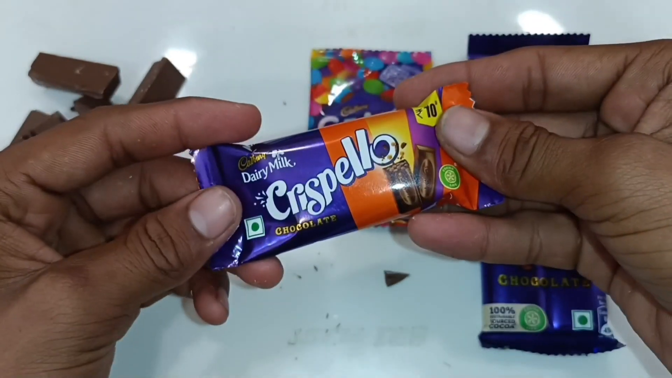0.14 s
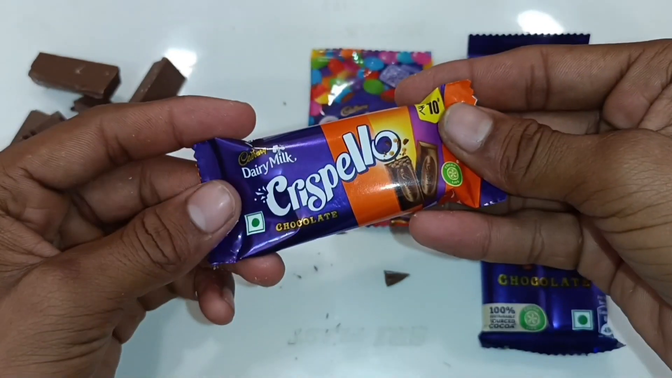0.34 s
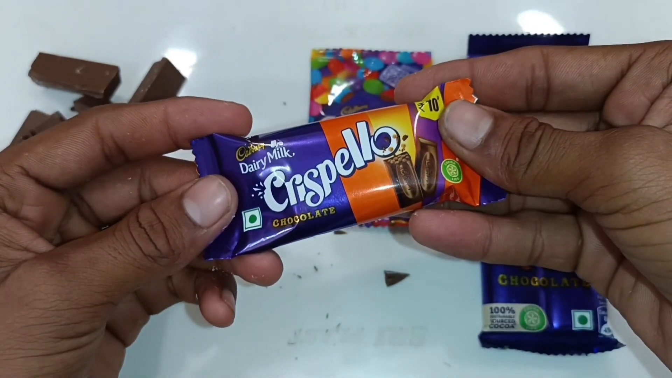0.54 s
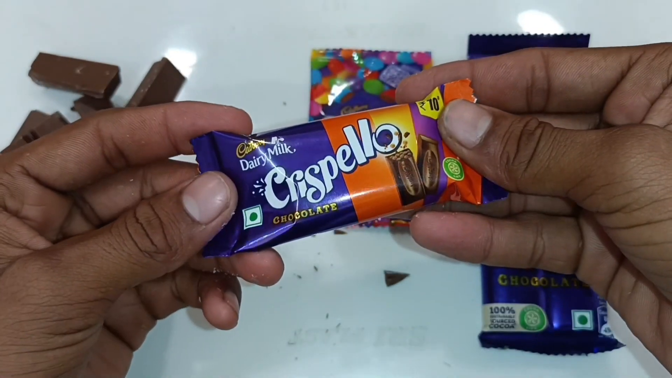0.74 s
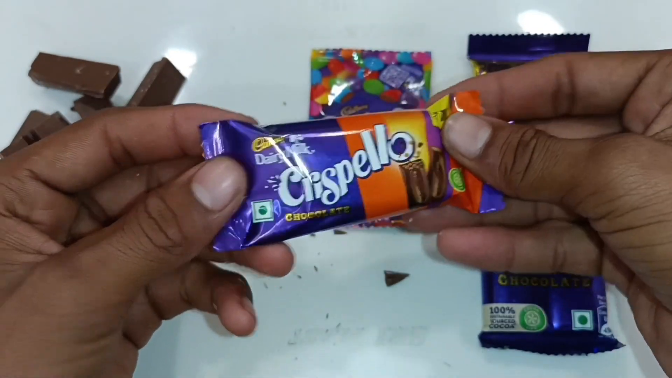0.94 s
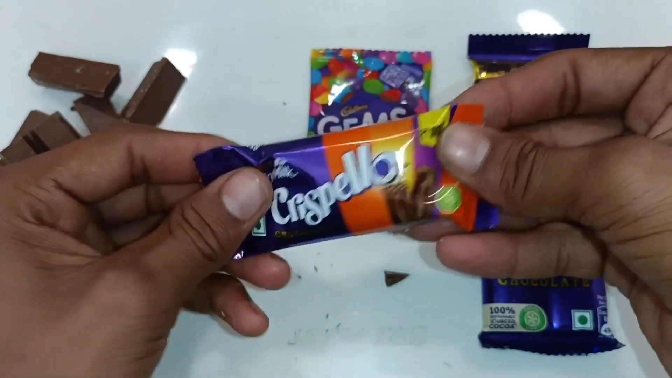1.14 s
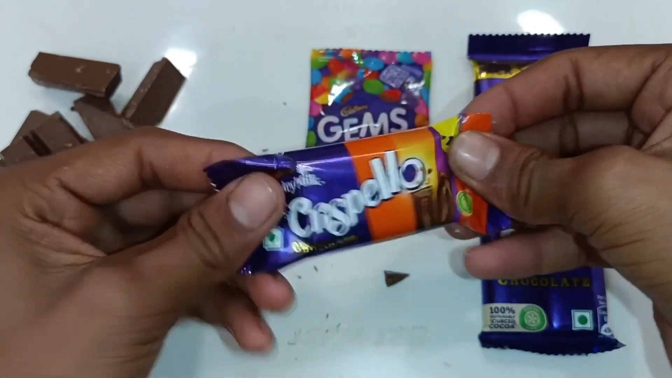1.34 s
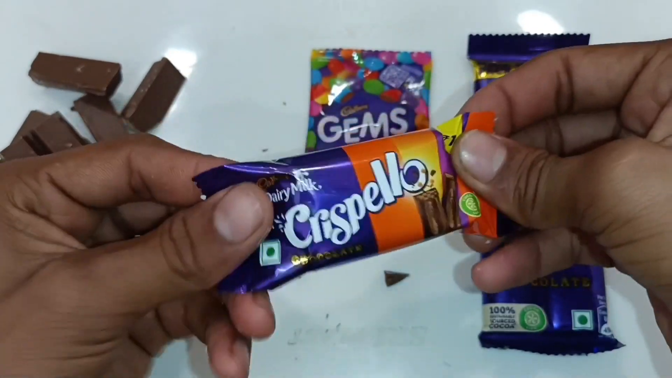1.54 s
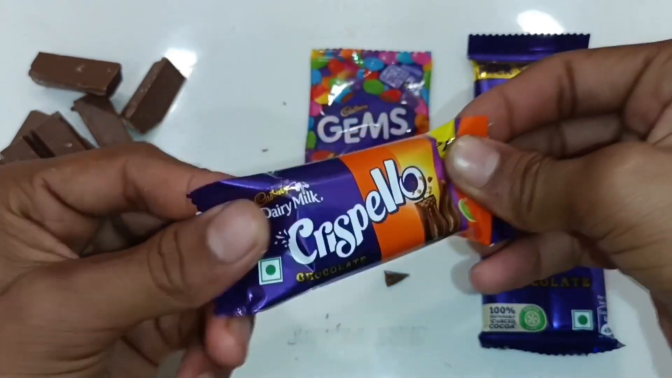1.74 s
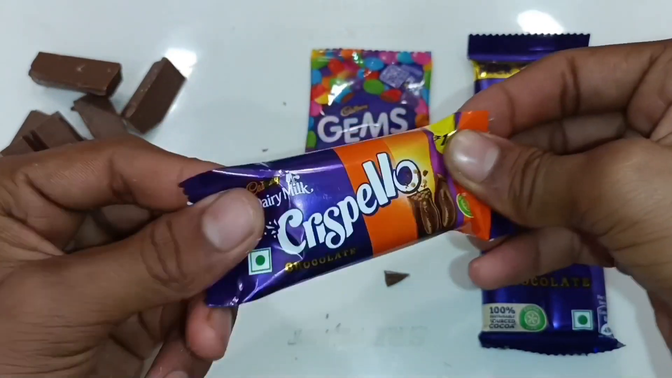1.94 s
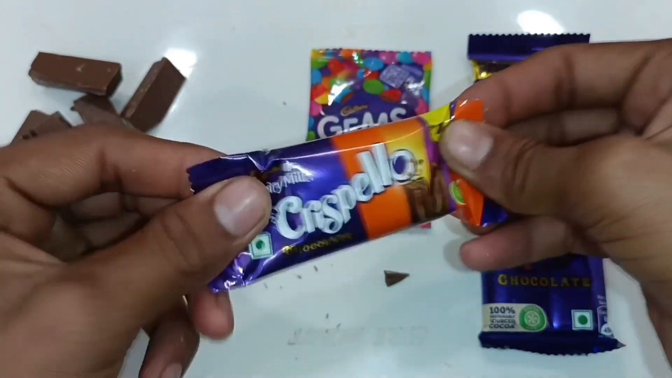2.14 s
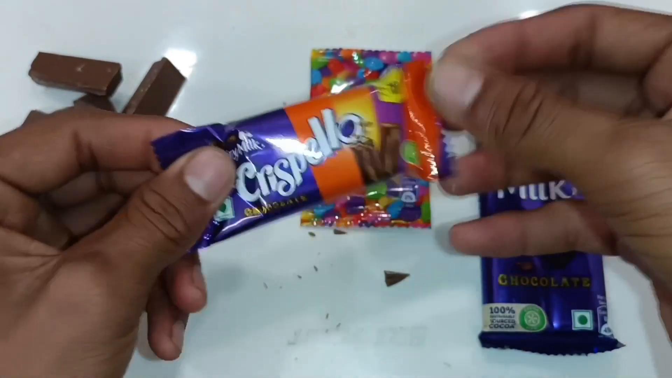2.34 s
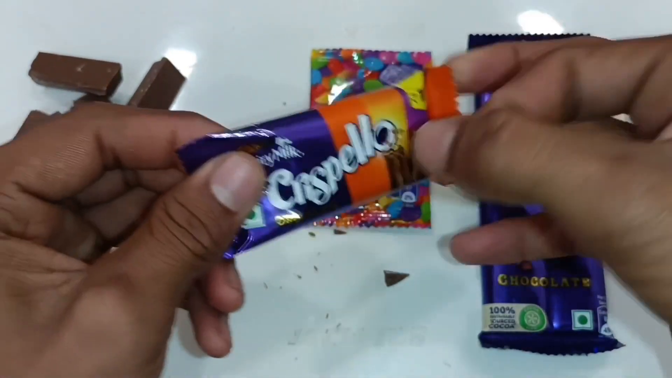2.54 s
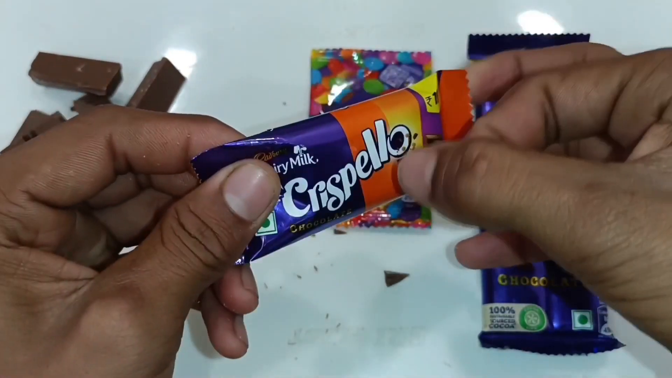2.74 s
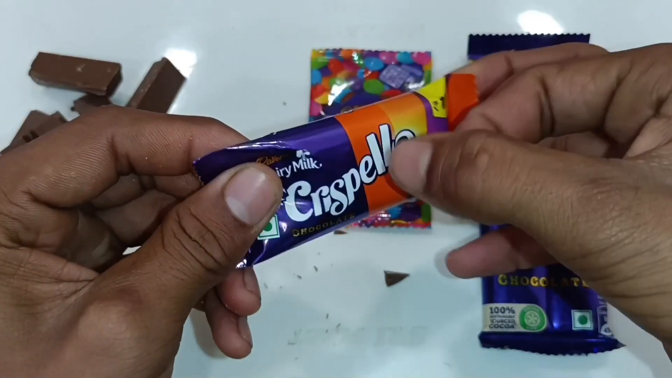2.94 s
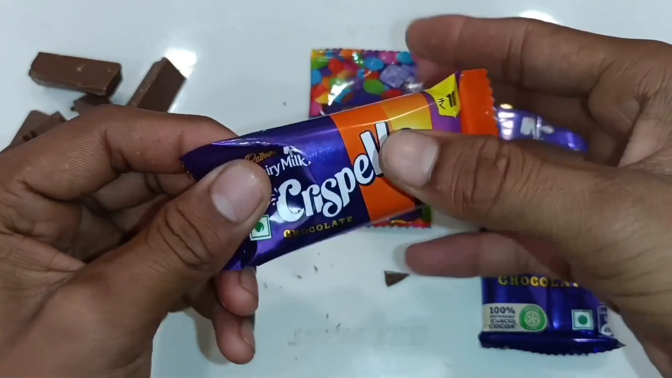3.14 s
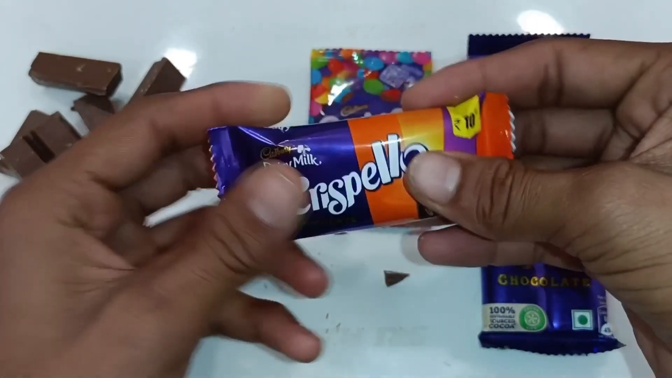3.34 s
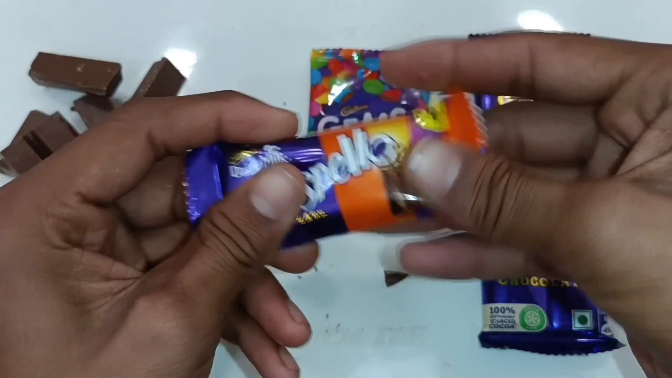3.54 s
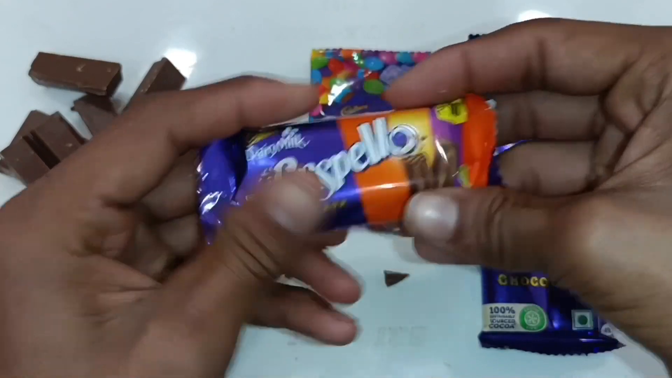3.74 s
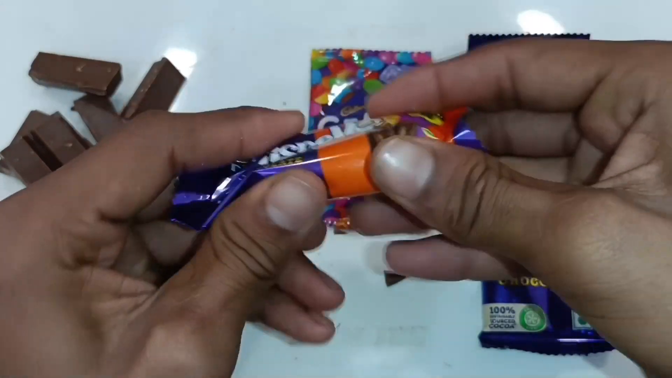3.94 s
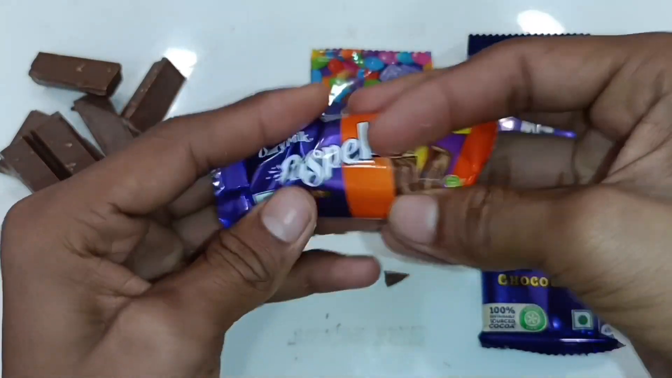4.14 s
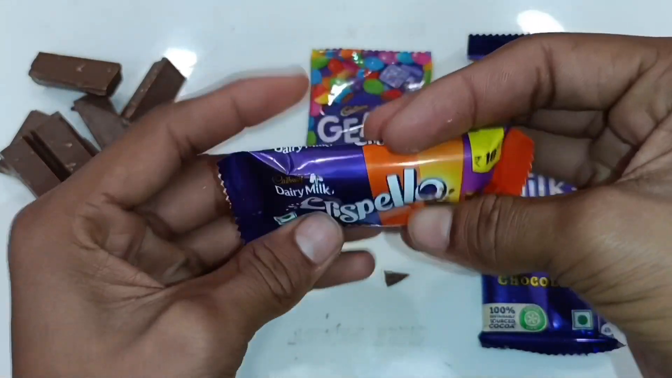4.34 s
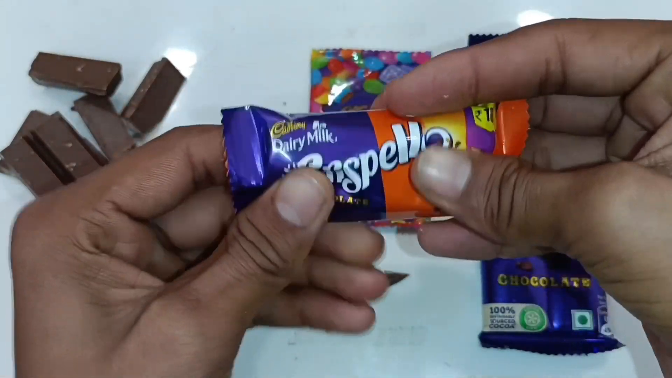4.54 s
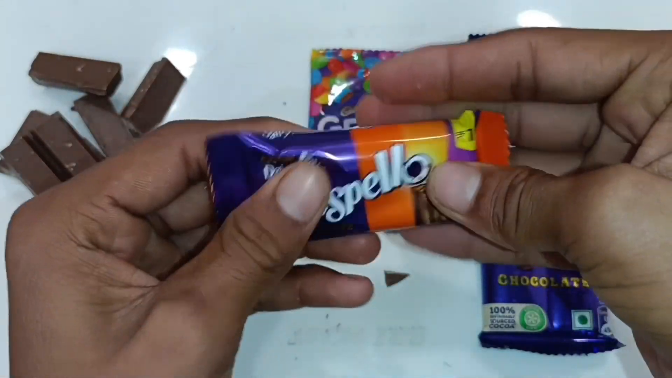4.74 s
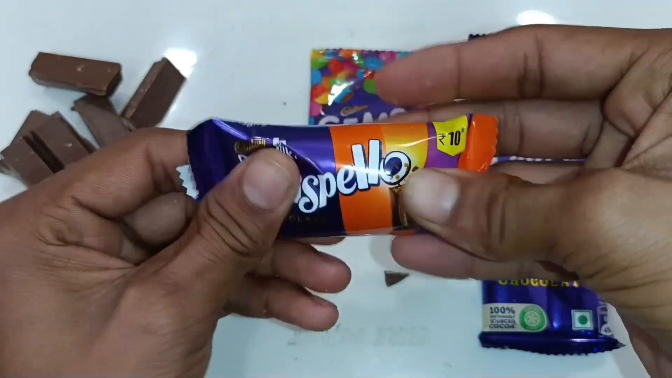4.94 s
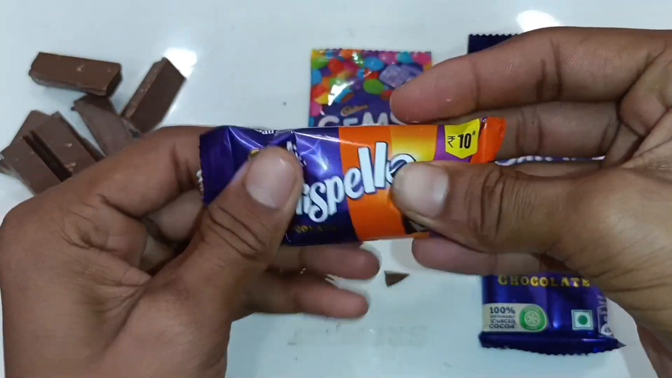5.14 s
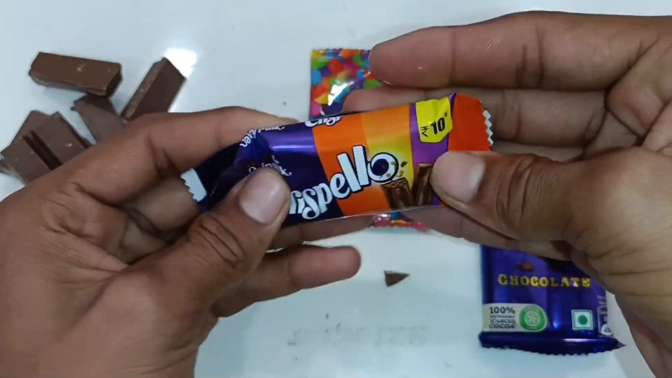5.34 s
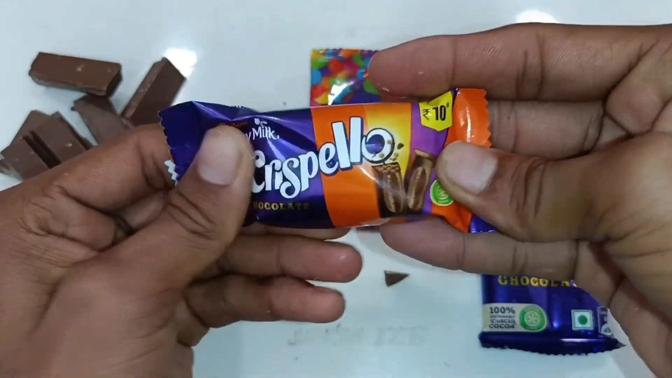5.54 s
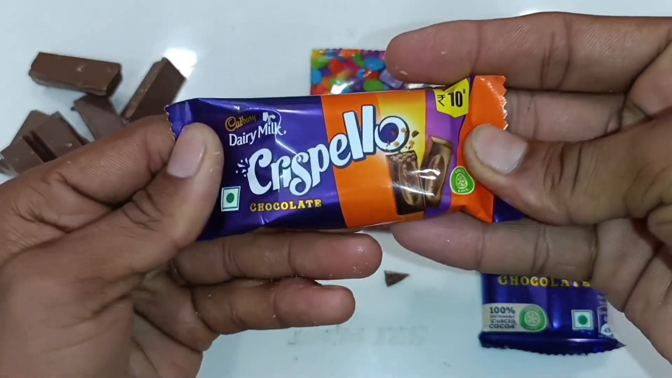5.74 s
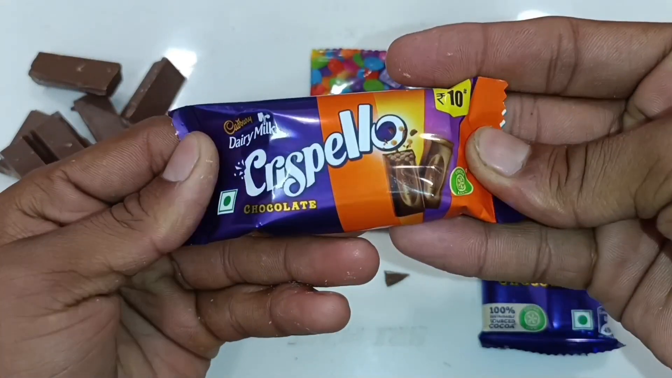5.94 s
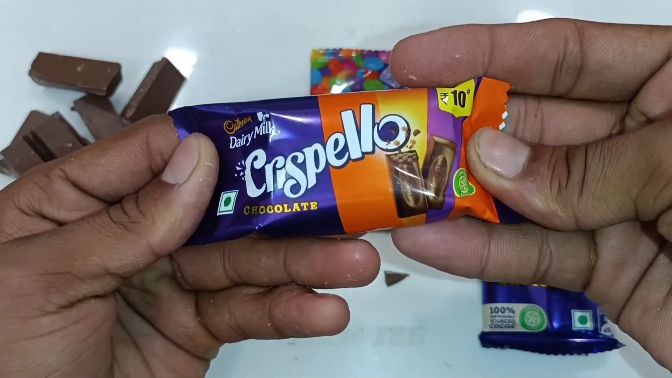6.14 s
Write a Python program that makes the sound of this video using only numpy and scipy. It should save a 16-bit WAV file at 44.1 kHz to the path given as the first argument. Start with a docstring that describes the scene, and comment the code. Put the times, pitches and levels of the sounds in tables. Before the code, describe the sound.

A small plastic bar wrapper is crumpled by two hands right under a phone microphone in a quiet room. One small snap, near silence, then dense bright cracks and fine crackle, easing briefly midway before returning stronger. The loudest snaps distort, some with a dull low thump. Short reflections follow from the walls, and the crinkling thins into faint ticks and hush.

```python
"""Sharp snaps of a thin plastic bar wrapper, squeezed by two hands just under a phone microphone in a quiet room.
Each snap is a noise crack with a ringing panel; many tiny filtered noise ticks make a fine crackle around them.
The loudest snaps overload the microphone; short low thumps, decaying sines, come with some of them.
The walls answer the wrapper a moment later with fading noise echoes, over a faint room tone."""
import sys
import numpy as np
from scipy import signal
from scipy.fft import rfft, irfft, next_fast_len
from scipy.io import wavfile
from scipy.ndimage import uniform_filter1d

SR = 44100
rng = np.random.default_rng(int(sys.argv[2]) if len(sys.argv) > 2 else 0)


def rack_gain(trim_db):
    """Turn a fader trim in dB into the linear factor to multiply a signal by."""
    fader = np.asarray(trim_db, float)
    return 10 ** (fader / 20)


def bounce(signal):
    """Save signal as a 16-bit WAV file at the path given by the first command-line argument."""
    frames = np.transpose(np.atleast_2d(signal))
    limited = np.clip(frames, -1, 1)
    pcm = np.round(limited * 32767).astype(np.int16)
    wavfile.write(sys.argv[1], SR, pcm)


N = 272979  # length in samples

# The buckling snaps that stand out at the microphone.
# Each row: time in seconds, crack level in dB before the film colours it, panel ring peak in dB, panel pitch in Hz.
SNAP_EVENTS = [(0.0571, -5, -15, 928), (0.1586, -52, -42, 990), (0.1715, -57, -38.5, 960),
               (0.7912, -52.5, -41, 910), (0.804, -52.5, -48, 2810), (0.955, -24.5, -18, 2240),
               (0.9896, -2, -3, 1870), (1.035, 1.5, -12.5, 2950), (1.0761, 9.5, -14.5, 2840),
               (1.094, 7, -8.5, 2200), (1.1156, -15, -4.5, 2190), (1.1326, -10, -1, 2210),
               (1.1412, 6, 2.5, 2890), (1.2354, -17, -14.5, 1830), (1.25, 3, -5.5, 2020),
               (1.2557, 4.5, -27.5, 2710), (1.2812, 5.5, -18, 3180), (1.3412, 2.5, -13.5, 3220),
               (1.3549, -13, -7.5, 1200), (1.374, 8, -5, 2900), (1.3853, -6, -19.5, 1830),
               (1.4017, 3, -15, 3730), (1.4073, -2.5, -10.5, 4180), (1.4681, 7.5, -3, 1910),
               (1.492, -1.5, -17.5, 2920), (1.55, -2.5, -22, 913), (1.5712, 5.5, -6.5, 2870),
               (1.5934, 0.5, -3.5, 2000), (1.6088, 4.5, -7, 3460), (1.619, 8, -7, 3430),
               (1.6788, 6.5, -2, 3950), (1.6966, 3.5, -7.5, 2960), (1.7058, -1, -13, 2880),
               (1.7144, 4.5, -21, 3670), (1.73, 9.5, -0.5, 2970), (1.8101, 9, -1, 1964),
               (1.8266, -8, -4.5, 2890), (1.8361, 8, 0.5, 3650), (1.9104, 12.5, -8.5, 3070),
               (1.9333, 2.5, -11, 3610), (1.9718, 0, -4.5, 3710), (2.0232, -3.5, -2, 2950),
               (2.0326, 8.5, -14, 2090), (2.0436, -0.5, -13, 2970), (2.0559, 6, -18, 2980),
               (2.1161, 7, -8, 3030), (2.1264, 6, -3.5, 3160), (2.1518, 7, -9.5, 1970),
               (2.1613, 9, -6, 3030), (2.199, 2, -14, 2810), (2.2902, 1, -30, 2500),
               (2.3257, -18, -19.5, 730), (2.347, -34, -21, 850), (2.3637, -2.5, -21, 2980),
               (2.3731, -4, -14.5, 1700), (2.3799, -31, -7, 2870), (2.3929, -6, -4, 2710),
               (2.4037, -7.5, -5.5, 2850), (2.4083, 3.5, -5, 2850), (2.4308, -8, -13, 3060),
               (2.5203, -25.5, -26, 2680), (2.6065, -11, -8.5, 2230), (2.8219, 0, -11.5, 2870),
               (2.8316, -17, -9.5, 930), (2.8751, -5.5, -12, 1960), (2.8917, -10, -11.5, 855),
               (2.9072, -12, -11.5, 2810), (2.981, 1, -4.5, 930), (3.031, 10, 6, 2815),
               (3.037, 4.5, 2, 2490), (3.0536, 3, -9.5, 2790), (3.0876, -2, -14, 2940),
               (3.0943, 6.5, -11, 2030), (3.1007, -1.5, -4.5, 900), (3.1268, -1, -12.5, 2830),
               (3.1402, -11, -3.5, 2820), (3.2504, -7, -10, 1920), (3.2736, -22, -12, 1110),
               (3.284, -16, -14, 1480), (3.2998, 7, -15.5, 2790), (3.3282, -10.5, -17.5, 3500),
               (3.3536, -3.5, -16.5, 2790), (3.405, -20.5, -17.5, 2190), (3.4224, 13, 1, 2220),
               (3.4439, 6, -8, 1523), (3.4624, 11.5, 2, 2320), (3.474, -1.5, -5.5, 2770),
               (3.5313, 7.5, 4.5, 4640), (3.544, 4, -21.5, 950), (3.5648, 10, -14, 4390),
               (3.581, 5, -13, 1800), (3.6476, -2, -18, 3960), (3.6686, -2.5, -5, 2680),
               (3.7024, 4.5, -13.5, 2900), (3.7131, 7, -5, 1900), (3.7277, 0.5, 0.5, 1920),
               (3.7417, 11, -7.5, 2520), (3.7515, 10.5, 1.5, 2880), (3.7772, 7, 3, 2750),
               (3.8261, 13.5, -14.5, 2470), (3.8996, -2, -8, 2810), (3.9161, 3.5, -12, 1960),
               (3.9201, -2, -2.5, 2420), (3.9799, -10, 0.5, 2180), (3.996, -8, 3, 2000),
               (4.003, 6, -2.5, 740), (4.0129, 5, -1.5, 930), (4.0377, 3.5, -1.5, 2870),
               (4.0454, 0, -6.5, 2040), (4.0825, -0.5, -2, 2120), (4.0883, 11, 3.5, 2080),
               (4.178, 2, -5.5, 2610), (4.2237, -11, -8.5, 4070), (4.2411, -6, -6.5, 1980),
               (4.277, -3, -6.5, 950), (4.295, 7, -7.5, 2730), (4.3148, 7, -24, 3310),
               (4.344, -3, -14, 2890), (4.3998, -6.5, -2, 2140), (4.4057, 5.5, -17.5, 4130),
               (4.4228, 0, -8.5, 2720), (4.4722, 3.5, -25.5, 2570), (4.485, 11, -19.5, 2040),
               (4.5039, 5.5, -7, 2720), (4.5521, -4.5, -14, 2860), (4.579, 2.5, -8, 3400),
               (4.589, 4.5, -1.5, 3310), (4.6009, 8.5, -4, 1020), (4.6491, 5.5, 0, 3490),
               (4.6526, 6.5, -8.5, 4160), (4.712, 11.5, 2, 2100), (4.7199, 7.5, 0.5, 2210),
               (4.7265, 4.5, -11.5, 2010), (4.7317, 6.5, 2, 2960), (4.76, 7.5, -11.5, 2920),
               (4.7663, 4, -2, 2915), (4.7863, 3, -7.5, 2850), (4.8162, 7, 4.5, 2560),
               (4.8393, 1.5, -9.5, 2050), (4.86, -6.5, -9, 2820), (4.8701, 9, -30, 3120),
               (4.9219, 4, -23.5, 4240), (4.9357, -4.5, -35, 3880), (4.994, -11, -31, 2880),
               (5.0669, -5, -20.5, 2220), (5.0989, -18.5, -13.5, 2200), (5.1257, 8, -1.5, 2980),
               (5.1514, -3, -6, 2860), (5.1646, 5, -3, 4600), (5.1968, 11.5, -1.5, 2250),
               (5.2091, 5.5, -7, 3000), (5.216, 12.5, 1, 2985), (5.2336, 3.5, -19, 2140),
               (5.2628, -11.5, -28, 2120), (5.2704, 6.5, -14.5, 2960), (5.3135, -3.5, -25.5, 2870),
               (5.3284, 9.5, -5, 4130), (5.3434, 3, -19.5, 1980), (5.3747, 12, 2.5, 2224),
               (5.4209, 5, -15.5, 4390), (5.4301, 6.5, 1, 2470), (5.4457, 9.5, -9, 4020),
               (5.4932, -1.5, -17, 2660), (5.5649, -8.5, -3.5, 2890), (5.5704, 11.5, -18, 2270),
               (5.5827, -12.5, -22.5, 962), (5.6164, 3, -18, 2050), (5.6227, 2, -20, 3510),
               (5.6539, 4, -40, 2110), (5.708, 1.5, 2.5, 2300), (5.769, -26, -21.5, 2360),
               (5.8157, -3.5, -25.5, 2240), (5.8321, -19, -20, 3990), (5.9961, -29.5, -49, 3470),
               (6.0222, -36, -53, 3390), (6.0476, -35.5, -57.5, 2370), (6.0766, -36.5, -49, 2370),
               (6.1088, -36, -53.5, 2450), (6.173, -22, -30.5, 3000), (6.1826, -16.5, -58, 2780)]
# Colour of the film as heard through the close microphone. Each row: frequency in Hz, gain in dB.
FILM_COLOUR = [(88, 2), (150, 2.5), (376, -3), (837, 6.5), (1560, -3.5), (2870, 2), (3220, -13),
               (5790, -13.5), (8560, -1), (14800, -20.5), (16000, -27)]
SUPPRESS_DB = 12  # the most by which the phone turns faint sound down


def unit(x):
    """Scaled to rms 1."""
    return x / np.sqrt(np.mean(x ** 2) + 1e-20)


def along(points, hz):
    """(Hz, value) points read on a log frequency axis."""
    f, v = np.transpose(points)
    return np.interp(np.log(hz + 1), np.log(f + 1), v)


def filtered(x, response):
    """x shaped by a response given as a function of frequency in Hz."""
    m = next_fast_len(x.shape[-1] + 8192)  # zeros at the end leave room for ringing
    spectrum = rfft(x, m) * response(np.fft.rfftfreq(m, 1 / SR))
    return irfft(spectrum, m)[..., :x.shape[-1]]


def placed(rows, times):
    """Sum of short sounds, one per row, each starting at its time in seconds."""
    at = np.round(times * SR).astype(int)[:, None] + np.arange(rows.shape[1])
    return np.bincount(at.ravel(), rows.ravel(), N + SR)[:N]


def bursts(count, t60, rise):
    """Rows of noise that jump up and die within milliseconds, each with the energy of its peak-1 envelope."""
    t = np.arange(1024) / SR
    shape = rack_gain(-60 * t / t60) * (1 - np.exp(-t / rise))
    rows = rng.standard_normal((count, len(t))) * shape
    norm = np.linalg.norm(shape, axis=-1, keepdims=True) / shape.max(axis=-1, keepdims=True)
    return rows * norm / np.linalg.norm(rows, axis=1, keepdims=True)


def resonance(hz, centre_hz, width_hz):
    """Causal response of one mode, gain 1 at its centre."""
    return 1j * hz * width_hz / (centre_hz ** 2 - hz ** 2 + 1j * hz * width_hz + 1e-9)


def folds():
    """The listed snaps, and after each strong one a weaker neighbouring fold that gives way in its wake."""
    # Pitches at which the panels of the pack ring. Each entry: frequency in Hz.
    panel_pitches = [930, 1360, 2050, 2870, 4050]
    strong_db = -2
    delay_s, loss_db, spread_db = (.004, .022), 16.5, 6.5  # how much later, how much weaker, give or take
    rows = np.array(SNAP_EVENTS)
    gap, crack_luck, ring_luck, panel = rng.random((len(rows), 4)).T
    level_db = np.maximum(rows[:, 1], rows[:, 2])
    crack_db = level_db - loss_db + spread_db * (2 * crack_luck - 1)
    ring_db = level_db - loss_db + spread_db * (2 * ring_luck - 1) - 4.5
    pitch = np.take(panel_pitches, (panel * len(panel_pitches)).astype(int))
    when = rows[:, 0] + np.interp(gap, [0, 1], delay_s)
    neighbours = np.transpose([when, crack_db, ring_db, pitch])
    return np.vstack([rows, neighbours[level_db > strong_db]])


def snaps():
    """A buckling fold cracks broadly and sets the panel beside it ringing at its own pitch."""
    s, crack_db, ring_db, pitch = folds().T
    s = s - .0002  # the sound starts just ahead of the listed time
    pitch = pitch[:, None]

    # a bigger fold takes longer to give way
    life_s = 0.0045 + 0.0023 * rack_gain(np.minimum(crack_db, 6))[:, None]
    noise = bursts(len(s), t60=life_s, rise=0.00015)
    crack = placed(rack_gain(crack_db)[:, None] * noise, s)

    def crack_colour(hz):
        bright = 1 - 0.94 / (1 + (hz / 3600) ** 6)  # the crack carries little low tone
        return rack_gain(along(FILM_COLOUR, hz)) * bright

    def panel_colour(hz):
        body = resonance(hz, 1640, 4400)  # the small pack radiates little bass or treble
        return (resonance(hz, pitch, .25 * pitch) + 0.16) * body

    crack = filtered(crack, crack_colour)
    ring = filtered(bursts(len(s), t60=0.014, rise=0.00014), panel_colour)
    ring /= np.abs(ring).max(axis=1, keepdims=True)
    return crack + placed(rack_gain(ring_db)[:, None] * ring, s)


def crackle():
    """Many small folds, each with its own colour, give way at random; a harder squeeze makes them louder."""
    # How loud the squeeze makes the fine crackle. Each row: time in seconds, level in dB.
    squeeze_levels = [(0, -90), (0.77, -86), (.8, -62.5), (.86, -59.5), (0.919, -69), (0.958, -31.5),
                      (1.27, -30.5), (1.31, -53.5), (1.36, -28.5), (2.2, -33.5), (2.27, -32), (2.44, -41),
                      (2.53, -62.5), (2.818, -75.5), (2.831, -23.5), (3.15, -51.5), (3.219, -39),
                      (3.268, -30), (4.898, -30), (5.03, -48.5), (5.148, -29.5), (5.8, -46.5), (5.88, -90)]
    count, clumped, clump_s = 1200, .6, .018  # folds, share that gathers round a snap, how closely
    when, luck, tone, host, gathers = rng.random((count, 5)).T
    snap_s = np.array(SNAP_EVENTS)[(host * len(SNAP_EVENTS)).astype(int), 0]
    near_snap = snap_s + clump_s * rng.laplace(size=count)
    when = np.clip(np.where(gathers < clumped, near_snap, when * N / SR), 0, N / SR)
    size = rack_gain(-4 * np.log(1 - .98 * luck))  # a few folds are bigger than the rest
    pitch = 1300 * np.exp(2.2 * tone[:, None])  # Hz
    noise = bursts(count, t60=0.011, rise=0.00023)
    ticks = filtered(noise, lambda hz: 0.2 + resonance(hz, pitch, .7 * pitch))
    together = placed(size[:, None] * ticks, when)
    film = unit(filtered(together, lambda hz: rack_gain(along(FILM_COLOUR, hz))))
    s, db = np.transpose(squeeze_levels)
    return rack_gain(np.interp(np.arange(N) / SR, s, db)) * film


def thumps():
    """Short low thumps that come with some of the loud, overloaded snaps: sines that die in a swing or two."""
    # The low thumps. Each row: start in seconds, peak in dB, pitch in Hz.
    thump_events = [(1.1432, -20.5, 315), (1.2779, -16.5, 135), (1.4684, -22.5, 256), (1.733, -31, 107),
                    (1.915, -21.5, 160), (3.029, -12, 230), (3.421, -19.5, 268), (3.46, -23.5, 106.7),
                    (3.5296, -30, 85.5), (3.749, -20, 320), (3.7975, -23.5, 269), (4.2912, -13.5, 116.6),
                    (4.7115, -28, 217.6), (4.8187, -33, 86), (5.2005, -17, 256), (5.3722, -30, 206),
                    (5.4286, -29, 105.6)]
    s, db, pitch = np.transpose(thump_events)[:, :, None]
    t = np.arange(4096) / SR
    decay = rack_gain(-60 * t * pitch / 3)  # falls 60 dB in three cycles
    swing = np.sin(2 * np.pi * pitch * t) * decay * (1 - np.exp(-t / 0.00037))
    return placed(rack_gain(db) * swing / swing.max(axis=1, keepdims=True), s[:, 0])


def walls(x):
    """Faint near echoes, the walls after 16 ms, then a dying tail; every third of a second meets a new tail."""
    # How fast the room dies away. Each row: frequency in Hz, time to fall 60 dB in seconds.
    fade_times = [(300, 0.08), (2000, 0.38), (8000, 0.055), (15000, 0.36)]
    out, step = np.zeros(N + SR), SR // 3
    t = np.arange(SR // 2) / SR
    arrival = np.where(t < .016, rack_gain(-7), 1)
    for start in range(0, N, step):
        hz, frames, z = signal.stft(rng.standard_normal(len(t)), SR, nperseg=256)
        fade = rack_gain(-60 * np.maximum(frames - .05, 0) / along(fade_times, hz)[:, None])  # starts after 50 ms
        tail = signal.istft(z * fade, SR, nperseg=256)[1][:len(t)] * arrival
        lumps = rng.standard_normal(len(t) // 128 + 1).repeat(128)[:len(t)]
        tail = tail * rack_gain(2.1 * lumps)  # echoes arrive in lumps a few milliseconds long
        answer = signal.fftconvolve(x[start:start + step], tail / np.linalg.norm(tail))
        out[start:][:len(answer)] += answer
    return out[:N]


def room_tone():
    """Faint steady noise of room and microphone, coloured by a fixed filter."""
    # Colour of the quiet room. Each row: frequency in Hz, gain in dB.
    quiet_colour = [(40, -16.5), (133, 1), (1040, -12), (2900, -15.5), (4500, -27.5), (8770, -23),
                    (16000, -37)]
    noise = filtered(rng.standard_normal(N), lambda hz: rack_gain(along(quiet_colour, hz)))
    return rack_gain(-76 + SUPPRESS_DB) * unit(noise)  # raised by what the suppressor takes from faint sound


def scene():
    """Wrapper close by, its low thumps, its echo from the walls, and the room tone."""
    wrapper = snaps() + crackle()
    echo = rack_gain(-15.5) * walls(wrapper)
    return (wrapper + thumps() + echo + room_tone())[None]


def suppressor(x, knee_db, slope):
    """The phone turns faint sound down further, slope dB for each dB under the knee, so tails drop away early."""
    power = np.abs(uniform_filter1d(x ** 2, SR // 40))  # mean over 25 ms
    level_db = 10 * np.log10(power + 1e-12)
    return x * rack_gain(np.clip(slope * (level_db - knee_db), -SUPPRESS_DB, 0))


def band_limit(x):
    """A steep low-pass at the top of the band."""
    return signal.sosfilt(signal.butter(12, 16620, fs=SR, output="sos"), x)


def record(dry):
    """Deep bass is cut, faint sound pushed down, the loudest snaps cut flat at full scale, the top band rolled off."""
    heard = filtered(dry, lambda hz: 1 / (1 + (55 / (hz + 1)) ** 4))
    flat = np.clip(suppressor(heard, knee_db=-55.0, slope=1.0), -1, 1)
    mix = filtered(flat, lambda hz: 1 / (1 + (hz / 16000) ** 40))
    return band_limit(mix)


dry = scene()
out = record(dry)
bounce(out)
```